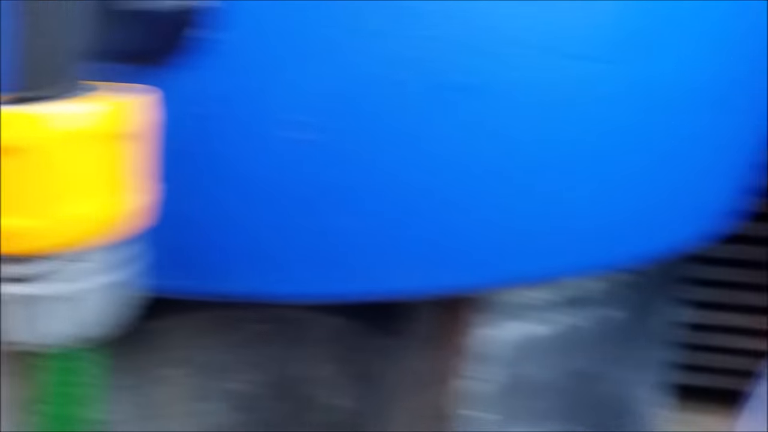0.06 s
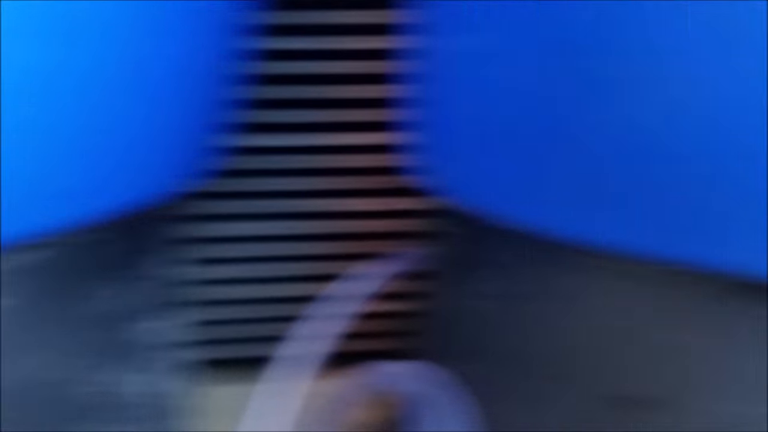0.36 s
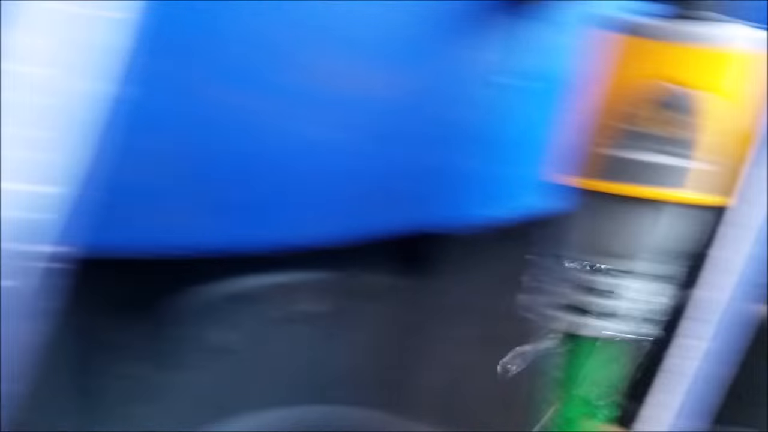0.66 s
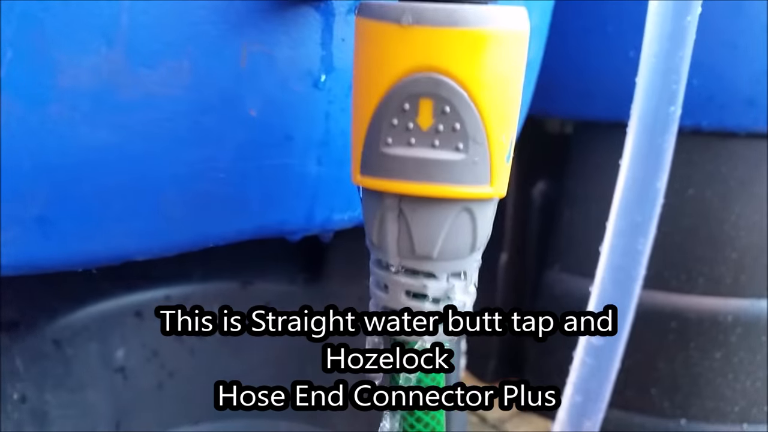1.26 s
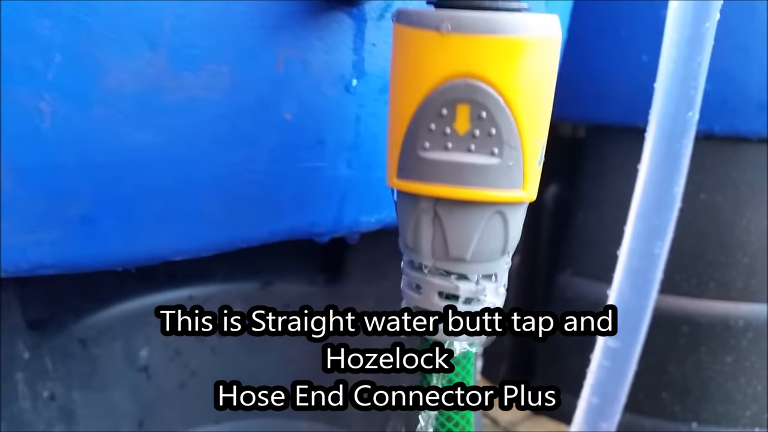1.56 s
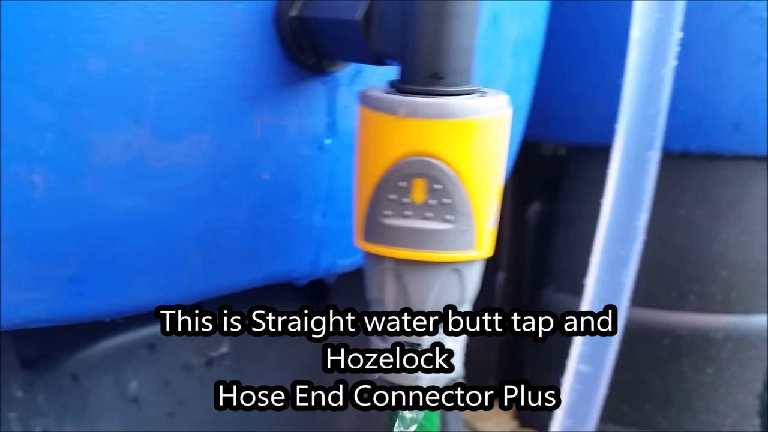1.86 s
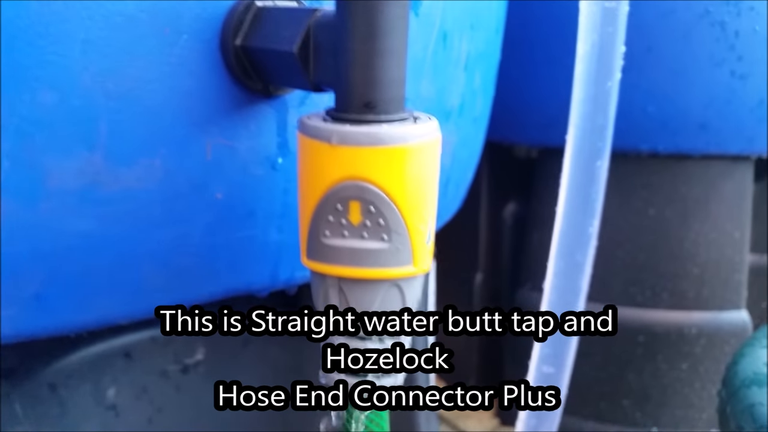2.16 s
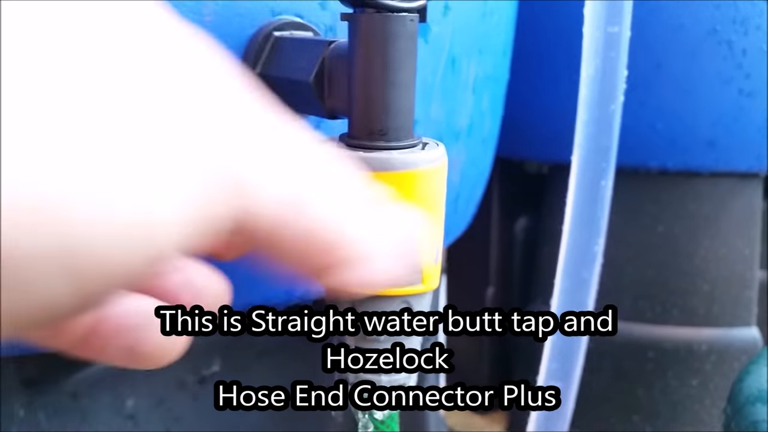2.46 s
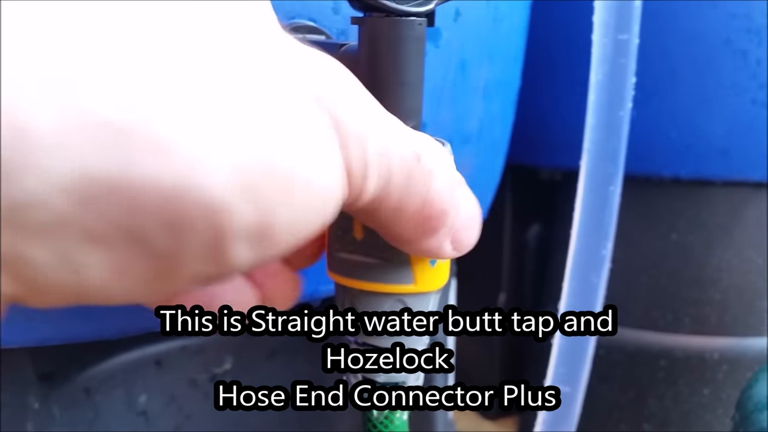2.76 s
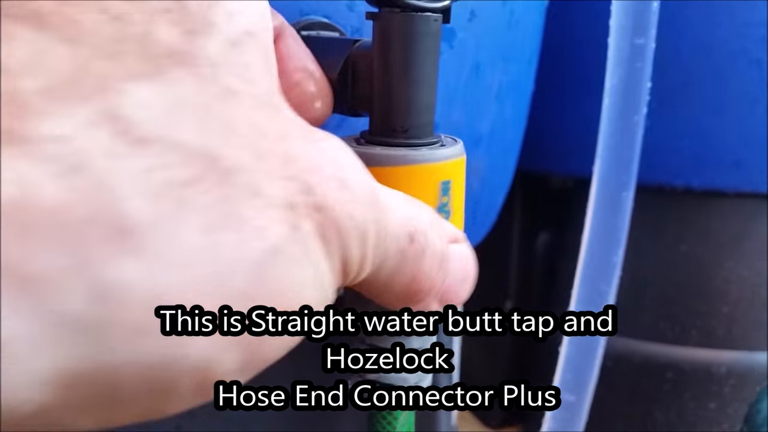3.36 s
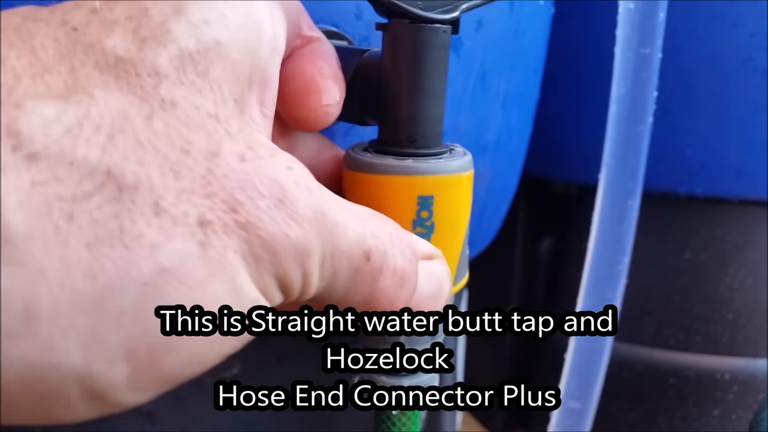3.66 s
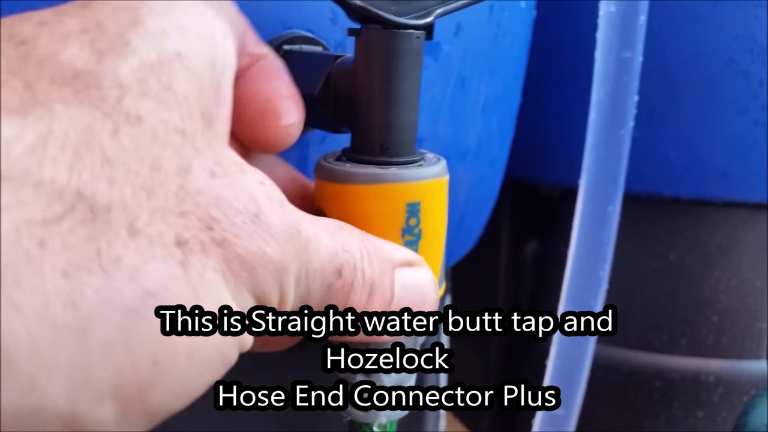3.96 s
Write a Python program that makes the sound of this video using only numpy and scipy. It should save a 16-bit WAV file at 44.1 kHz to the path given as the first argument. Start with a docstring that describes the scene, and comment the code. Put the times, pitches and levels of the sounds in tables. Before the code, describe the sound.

A leaking hose connector hisses thinly throughout, with drip ticks and a hollow trickle. The microphone is bumped at 0.2 seconds and air puffs on it until 0.7. Water spatters near 0.8 with a soft knock, then spits sharply around 1.4. The hiss swells at 2.6, just before a hand knocks and clicks on hollow plastic. A low outdoor rumble and a slowly falling distant engine drone lie behind.

```python
"""A thin high hiss, drip ticks and a hollow trickle: a garden hose connector leaks at a water butt.
Escaping water hisses, spits and spatters; the trickle rings in the tub.
The hand-held camera is bumped as it swings round, air puffs on its microphone,
and a hand knocks on the hollow plastic as it takes hold.
Behind are a low outdoor rumble and a far engine whose drone slowly falls."""
import sys
import numpy as np
from scipy import signal
from scipy.fft import rfft, irfft, next_fast_len
from scipy.io import wavfile
from scipy.ndimage import uniform_filter1d, map_coordinates

SR = 44100
rng = np.random.default_rng(int(sys.argv[2]) if len(sys.argv) > 2 else 0)


def store_wav(level_fs):
    """Save 16-bit WAV to argv[1]."""
    pcm = np.round(np.clip(np.atleast_2d(level_fs), -1, 1) * 32767)
    wavfile.write(sys.argv[1], SR, pcm.T.astype(np.int16))


N = 176400

# spatter, loudest as the camera swings past the leak: t/s, level/dB
SPATTER_LEVEL = [(0, -102), (.3, -73), (.62, -69.5), (.74, -66), (.88, -65), (1.05, -73), (1.2, -82.5),
                 (2.4, -77.5), (2.65, -69.5), (2.9, -77)]


def amp(db):
    """Decibels to gain."""
    return 10 ** (np.asarray(db) / 20)


def unit(x):
    """Scale to rms 1."""
    return x / np.sqrt(np.mean(x ** 2) + 1e-20)


def along(points, hz):
    """Interpolate (f/Hz, value) points on a log axis."""
    f, v = np.transpose(points)
    return np.interp(np.log(hz + 1), np.log(f + 1), v)


def curve(rows):
    """Interpolate (t/s, value) points per sample."""
    return np.interp(np.arange(N) / SR, *np.transpose(rows))


def wobble(rate_hz):
    """Smooth random curve, rate_hz knots a second."""
    knots = rng.standard_normal(int(N * rate_hz / SR) + 4)
    return map_coordinates(knots, [np.arange(N) * rate_hz / SR])


def pan(db):
    """Stereo gains, left over right by db."""
    return amp(np.array([[db], [-db]]) / 2)


def filtered(x, response):
    """Apply a gain given as a function of f/Hz."""
    size = next_fast_len(N + SR // 2)
    return irfft(rfft(x, size) * response(np.fft.rfftfreq(size, 1 / SR)), size)[..., :N]


def coloured(x, spectrum, size=4096):
    """Minimum-phase filter of unit energy."""
    cepstrum = irfft(np.log(amp(along(spectrum, np.fft.rfftfreq(size, 1 / SR)))))
    cepstrum[1:size // 2] *= 2
    cepstrum[size // 2 + 1:] = 0
    impulse = irfft(np.exp(rfft(cepstrum)))
    return signal.fftconvolve(x, impulse[None] / np.linalg.norm(impulse), axes=1)[:, :N]


def rush(spectrum, patchy_db):
    """Stereo noise of rms 1, gain patchy in time and frequency."""
    # left-right likeness: f/Hz, coherence
    coherence = [(30, 0.89), (60, 0.92), (130, 0.89), (250, 0.63), (450, 0.73), (900, -0.033),
                 (4000, -0.012), (12000, 0.081)]

    def mid_side_gains(hz):
        angle = np.arccos(np.clip(along(coherence, hz), -1, 1)) / 2
        return amp(along(spectrum, hz)) * [np.cos(angle), np.sin(angle)]

    bins = signal.stft(rng.standard_normal((2, N)), nperseg=512)[2]
    patches = uniform_filter1d(rng.standard_normal(bins.shape[1:]), size=8, axis=0)
    patches = uniform_filter1d(patches, size=10, axis=1)
    pair = signal.istft(bins * amp(patchy_db * unit(patches)), nperseg=512)[1][:, :N]
    mid, side = filtered(pair, mid_side_gains)
    return unit(np.array([mid + side, mid - side]))


def add(track, at_s, sound):
    """Mix a sound into a track."""
    part = track[:, round(at_s * SR):][:, :sound.shape[-1]]
    part += sound[..., :part.shape[1]]


def struck(modes, t, attack_s):
    """Damped modes set off by a soft contact."""
    ring = sum(amp(db - 60 * t / t60_s) * np.sin(2 * np.pi * hz * t) for hz, db, t60_s in modes)
    return (1 - np.exp(-t / attack_s)) * ring


def engine():
    """Far drone, sinking in pitch, fading in and out on the air."""
    # drone: t/s, level/dB
    level = [(0, -56.5), (.63, -59), (.74, -38), (.85, -43), (.95, -52.5), (1.18, -52), (1.36, -42),
             (1.45, -57), (2.1, -50), (2.44, -54), (2.54, -46.5), (2.83, -45.5), (3.16, -58), (3.32, -42.5),
             (3.52, -46.5), (3.63, -39.5), (3.89, -40), (4, -48)]
    # partials: multiple of pitch, level/dB
    partials = [(.5, -12.5), (1, -0.5), (1.5, -20.5), (2, -25.5)]
    start_hz, sag_hz_per_s = 124.6, 6.1
    pitch_hz = (start_hz - sag_hz_per_s * np.arange(N) / SR) * (1 + 0.005 * wobble(12))
    phase = 2 * np.pi * np.cumsum(pitch_hz) / SR
    tone = sum(amp(db + 0.79 * wobble(9)) * np.sin(k * phase + rng.uniform(0, 2 * np.pi))
               for k, db in partials)
    return np.sqrt(2) * amp(curve(level)) * tone * pan(-1.3)


def outdoors():
    """Near-mono rumble under a diffuse far wash."""
    # envelopes: t/s, level/dB
    rumble_level = [(0, -50.5), (.28, -48.5), (.39, -47.5), (.98, -43), (1.15, -46), (2, -47.5),
                    (3.25, -47), (3.9, -48.5)]
    wash_level = [(0, -62.5), (.3, -64.5), (.6, -60), (1.3, -60), (1.8, -60.5), (3.2, -59.5), (4, -57.5)]
    # spectra: f/Hz, relative density/dB
    rumble_spectrum = [(12, -23.5), (24, -9), (40, -7.5), (57, 4), (78, -2.5), (100, -2), (135, -8),
                       (165, -10), (230, -14), (320, -25), (600, -81.5)]
    wash_spectrum = [(100, -13), (300, -1), (500, -0.5), (700, -4), (950, -1), (1250, -10), (1550, -19),
                     (2000, -25.5), (2500, -15), (3050, -25.5), (3600, -30.5), (4100, -13.5), (4800, -26.5),
                     (5400, -27), (6200, -71), (8000, -81.5)]
    rumble = amp(curve(rumble_level) + 1.3 * wobble(12)) * rush(rumble_spectrum, patchy_db=1.58)
    wash = amp(curve(wash_level) + wobble(5.82)) * rush(wash_spectrum, patchy_db=1.26)
    return rumble * pan(-1.4) + wash * pan(3)


def hiss():
    """Thin hiss of the leaking connector, with fine droplets ticking in it."""
    # hiss: t/s, level/dB
    level = [(0, -90), (.2, -81.5), (.42, -68.5), (.66, -69.5), (.85, -65), (1.02, -68), (1.14, -79.5),
             (1.3, -79.5), (1.5, -74), (2.2, -74), (2.42, -66.5), (2.6, -55.5), (2.8, -66), (2.95, -73.5),
             (3.3, -78), (3.7, -73.5), (4, -78)]
    # hiss and droplets: f/Hz, relative density/dB
    spectrum = [(2000, -20), (6300, -38), (7500, -54.5), (8800, -64), (9800, -20.5), (11000, -4.5),
                (12400, -1.5), (13700, -3.5), (15650, -1.5), (16000, -31)]
    count, ticks_per_s = 900, 250
    when, size_rank, side = rng.random((count, 3)).T
    onsets = (when * count / ticks_per_s * SR).astype(int)
    tick_db = -12 - 5 * np.log(size_rank + 0.039)  # many faint, few loud
    ticks = np.zeros((2, N))
    ticks[:, onsets] = amp(tick_db) * np.sqrt([side, 1 - side])
    droplets = coloured(ticks * np.sqrt(SR / ticks_per_s), spectrum)
    jet = amp(0.85 * wobble(27)) * rush(spectrum, patchy_db=2.5)
    return amp(curve(level)) * (jet + droplets)


def spatter():
    """Leaking water spatters: broad noise with a fast flutter."""
    # spatter: f/Hz, relative density/dB
    spectrum = [(300, -23), (900, 10.5), (1700, 4), (2600, 1.5), (3300, -1), (4300, 2), (5500, -4.5),
                (6800, -13), (8200, -35), (12000, -11.5)]
    return amp(curve(SPATTER_LEVEL) + wobble(40)) * rush(spectrum, patchy_db=1.5)


def trickle():
    """Trickling water rings in the hollow tub."""
    # trickle: t/s, level/dB
    level = [(0, -62), (.2, -65.5), (.5, -57), (.66, -59.5), (.9, -69), (1.01, -57.5), (1.12, -62),
             (1.45, -62), (1.57, -57), (1.67, -55.5), (1.74, -69.5), (2.63, -68.5), (2.72, -63), (3.2, -75),
             (3.33, -62.5), (3.9, -62.5)]
    # tub resonance: f/Hz, relative density/dB
    resonance = [(250, -26.5), (360, -0.5), (425, 10.5), (490, 8.5), (530, -0.5), (610, 0.5), (800, -36),
                 (3000, -91)]
    return amp(curve(level) + 1.2 * wobble(15)) * rush(resonance, patchy_db=-1.5)


def drips_and_clicks():
    """Drips, spits and finger clicks: a crack, then a snap and a bright ring over a lower one."""
    # small drips: t/s, level/dB
    drip_times = [(.189, -69), (.213, -63.5), (0.402, -56.5), (0.538, -57.5), (.774, -59), (0.812, -58),
                  (1.503, -62), (1.722, -64), (1.903, -64), (2.013, -63.5), (2.053, -57.5), (2.267, -66),
                  (2.309, -56), (2.491, -57.5), (2.521, -53), (2.665, -50.5), (2.867, -62), (3.122, -61.5),
                  (3.578, -67)]
    # spits of air and water, finger clicks on plastic:
    # t/s, level/dB, crack re ring/dB, ring f/Hz, lower ring/dB, pan/dB, t60/s
    clicks = [(1.3267, -53.5, 11, 11300, -4, -8, 0.036), (1.3603, -55.5, 9, 11100, -20, 2, 0.047),
              (1.3697, -41.5, 18, 11000, -16, -2, 0.04), (2.7238, -38, 15, 12300, -39, 1, 0.025),
              (3.747, -54, 14, 15500, -22, -2, .015)]
    # ring spectra: f/Hz, relative density/dB
    bright_spectrum = [(5000, -58), (8300, -38.5), (9500, -18.5), (10600, -2.5), (12200, 4.5), (13800, -3),
                       (15500, 1), (16800, -13.5)]
    lower_spectrum = [(2000, -34.5), (3500, -19), (4400, -5), (5500, 1), (6400, -7), (7200, -12.5),
                      (8300, -29), (12000, -54)]
    ring_db, ring_half_width_hz = 14, 1500
    snap_db, snap_t60_s = 3, 0.016
    drip_crack_db, drip_hz, drip_t60_s = 6.5, 13200, 0.06
    spatter_db = curve(SPATTER_LEVEL)
    drip_lower_db = -17 + (spatter_db - spatter_db.mean()) / 2  # fuller in loud spatter
    drips = [(at_s, db, drip_crack_db, drip_hz, drip_lower_db[round(at_s * SR)], 0, drip_t60_s)
             for at_s, db in drip_times]
    bright, lower = np.zeros((2, 2, N))
    t = np.arange(SR // 10) / SR
    hz = np.fft.rfftfreq(len(t), 1 / SR)
    for at_s, db, crack_db, ring_hz, lower_db, pan_db, t60_s in clicks + drips:
        gain = amp(db) * pan(pan_db)
        envelope = gain * (amp(-60 * t / t60_s) + amp(snap_db - 60 * t / snap_t60_s)) / 2
        resonance = 1 + amp(ring_db) / (1 + 1j * (hz - ring_hz) / ring_half_width_hz)
        ring = unit(irfft(rfft(rng.standard_normal((2, len(t)))) * resonance, len(t)))
        add(bright, at_s, amp(crack_db) * gain)  # one-sample crack
        add(bright, at_s, envelope * ring)
        add(lower, at_s, amp(lower_db) * pan(pan_db) * envelope * rng.standard_normal((2, len(t))))
    return coloured(bright, bright_spectrum) + coloured(lower, lower_spectrum)


def contact(at_s, body, scuff_db):
    """One handling contact: the struck body's sound plus a dull scuff."""
    # scuff: f/Hz, relative density/dB
    spectrum = [(230, 5.5), (400, -4.5), (580, -10), (950, -4.5), (1400, -13), (2100, -26.5), (3000, -38),
                (6000, -38), (8000, -68)]
    scuff_t60_s = 0.037
    thump, scuff = np.zeros((2, 2, N))
    t = np.arange(body.shape[-1]) / SR
    grit = rng.standard_normal(len(t)) + 2 * rng.standard_normal((2, len(t)))  # centre + wide
    add(thump, at_s, body)
    add(scuff, at_s, amp(scuff_db - 60 * t / scuff_t60_s) * grit)
    return thump + coloured(scuff, spectrum)


def camera_bump():
    """The swinging camera is bumped: a low dead thump."""
    # camera modes: f/Hz, level/dB, t60/s
    modes = [(58, -8.5, .05), (133, 3, 0.032), (215, -4.5, 0.027)]
    t = np.arange(SR // 4) / SR
    thump = amp(-26.5) * struck(modes, t, attack_s=0.0021) * pan(3)
    return contact(at_s=0.2125, body=thump, scuff_db=-41.5)


def air_puffs():
    """The swing pushes air on the microphone, nearly all on the right port."""
    # puffs: t/s, level/dB
    puffs = [(0.403, -33), (0.522, -31), (0.654, -25.5), (0.702, -45)]
    puff_hz, sigma_s, left_db = 72, 0.007, -20
    t = np.arange(N) / SR
    push = np.zeros(N)
    for at_s, db in puffs:
        envelope = amp(db) * np.exp(-((t - at_s) / sigma_s) ** 2 / 2)
        push += envelope * np.cos(2 * np.pi * puff_hz * (t - at_s))
    return np.array([amp(left_db) * push, push])


def plastic_knocks():
    """Soft gritty knocks on hollow plastic, the last as the hand takes hold."""
    # knocks: t/s, level/dB
    knocks = [(.848, -46.5), (2.666, -42)]
    # plastic modes: f/Hz, level/dB, t60/s
    modes = [(337, -7, 0.1), (402, 2.5, 0.059), (810, -6.5, 0.034), (2260, -14.5, 0.047)]
    ring = struck(modes, np.arange(SR // 4) / SR, attack_s=0.0008)
    return sum(contact(at_s, amp(db) * ring, scuff_db=db - 8) for at_s, db in knocks)


def scene():
    """Leak and handling close by, outdoors behind."""
    background = engine() + outdoors()
    leak = (hiss() + spatter() + trickle()) * pan(-1.3)
    return background + leak + drips_and_clicks() + camera_bump() + air_puffs() + plastic_knocks()


def record(dry):
    """The camera's band limit."""
    top_hz = 16500
    return filtered(dry, lambda hz: hz < top_hz)


dry = scene()
out = record(dry)
store_wav(out)
```